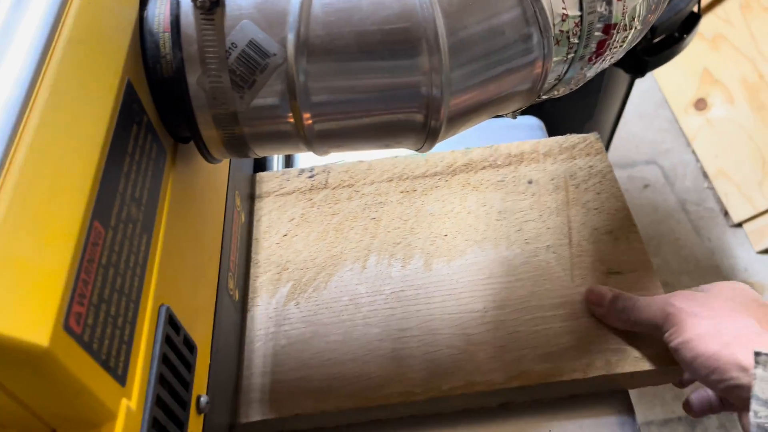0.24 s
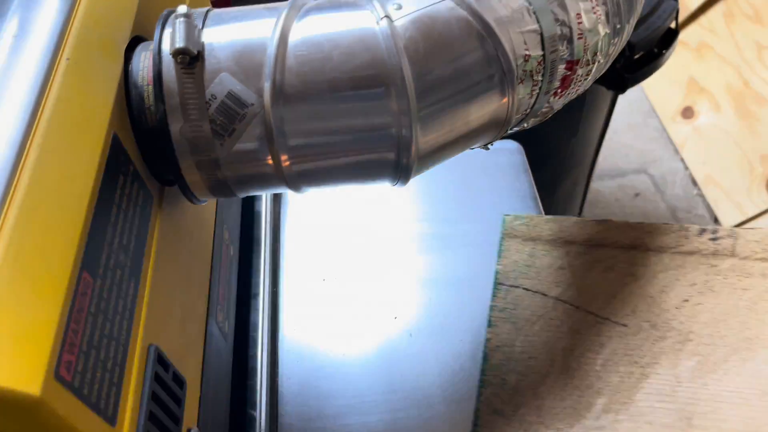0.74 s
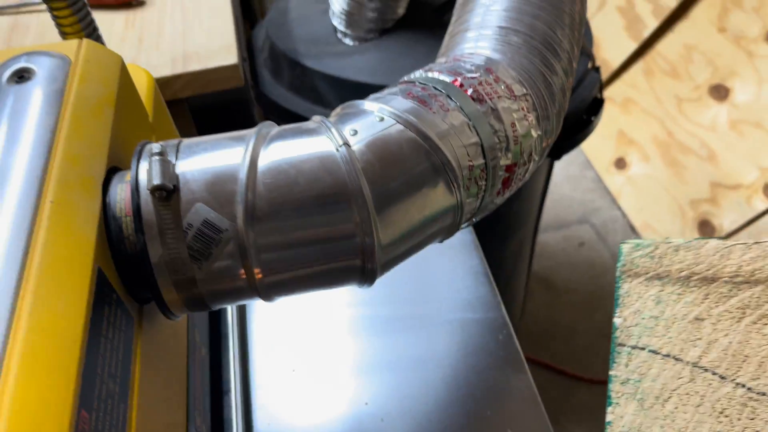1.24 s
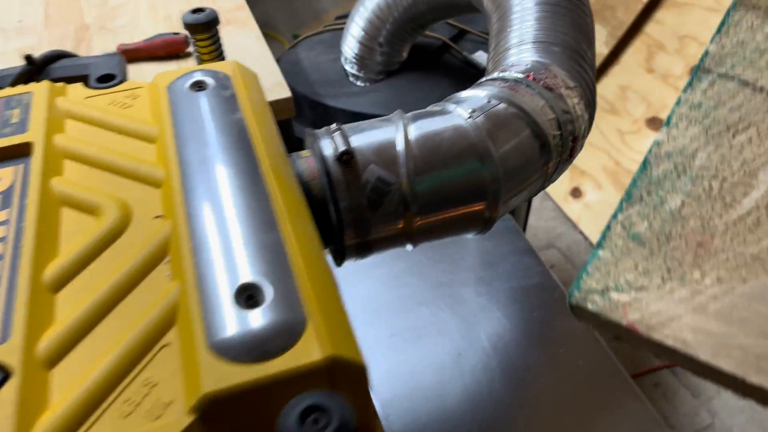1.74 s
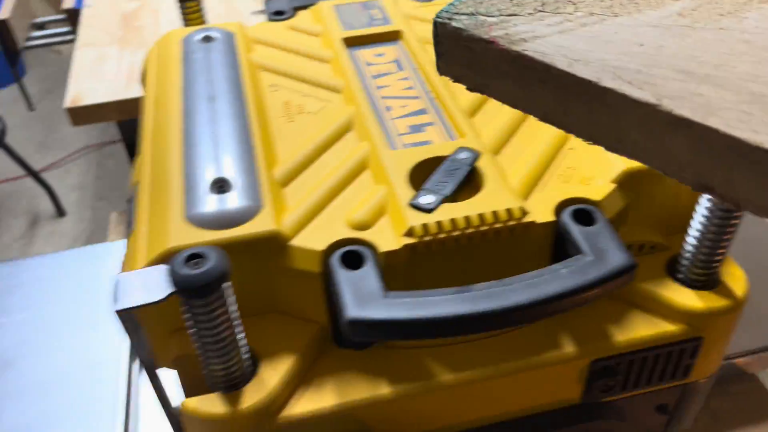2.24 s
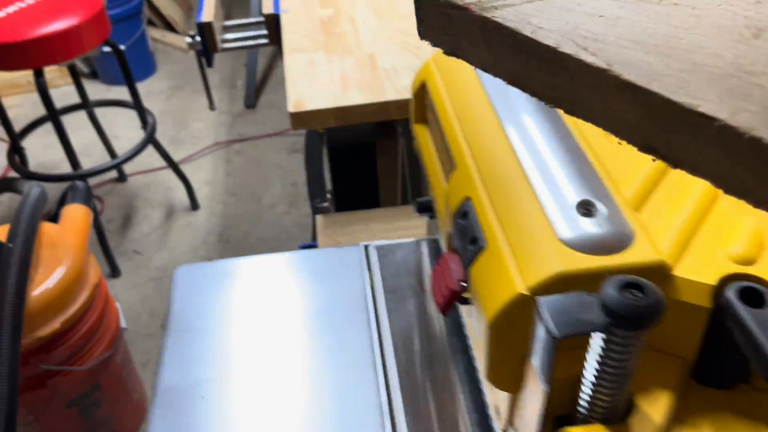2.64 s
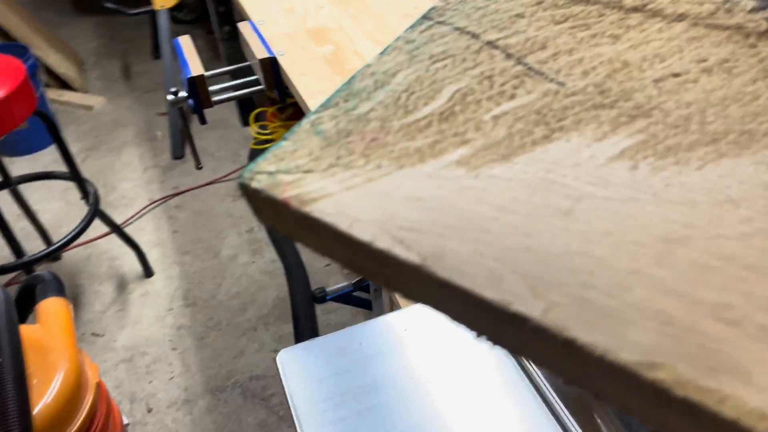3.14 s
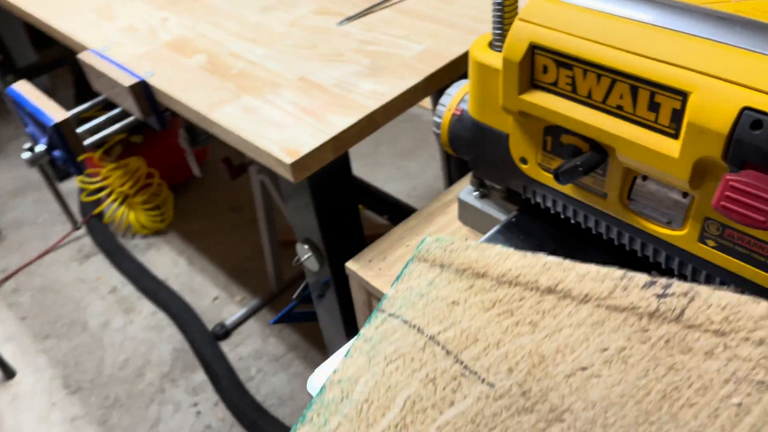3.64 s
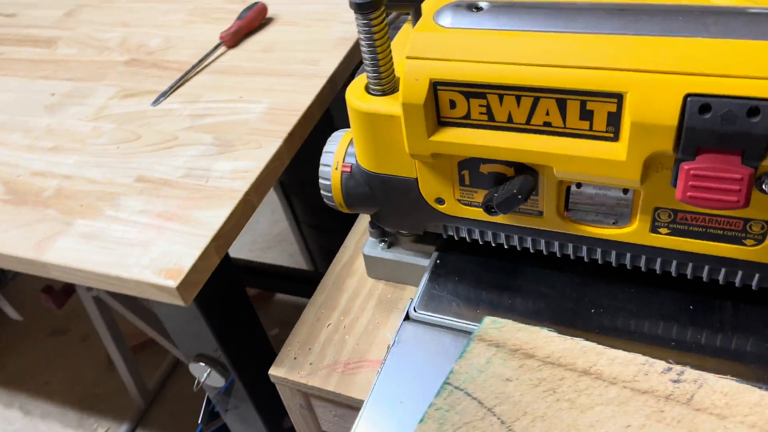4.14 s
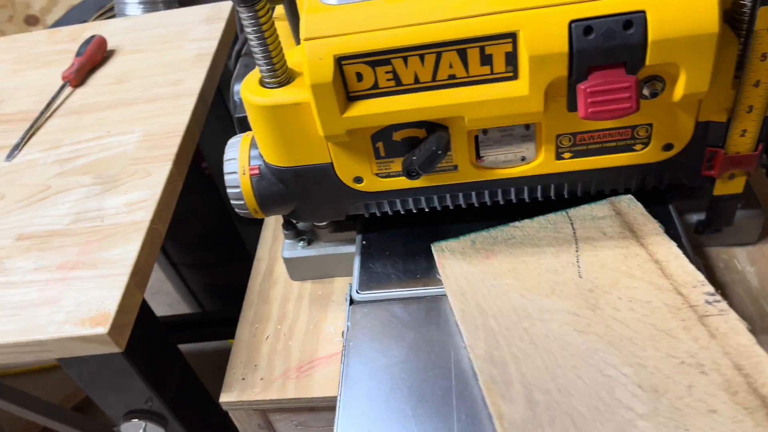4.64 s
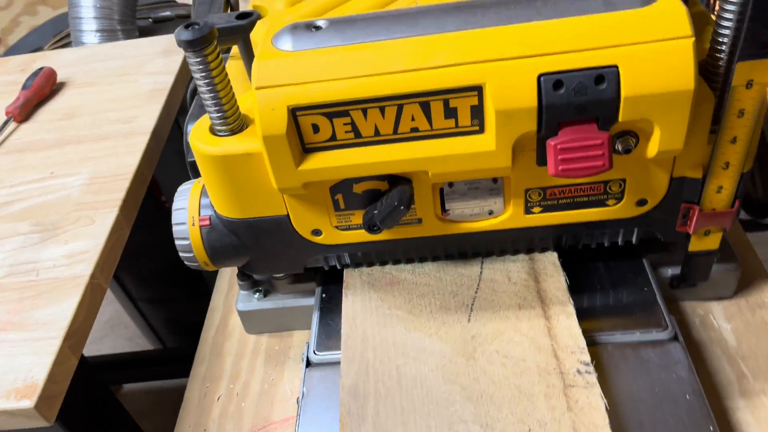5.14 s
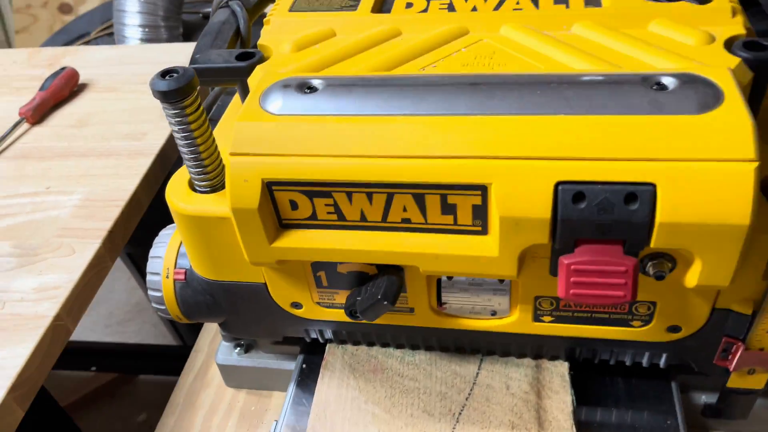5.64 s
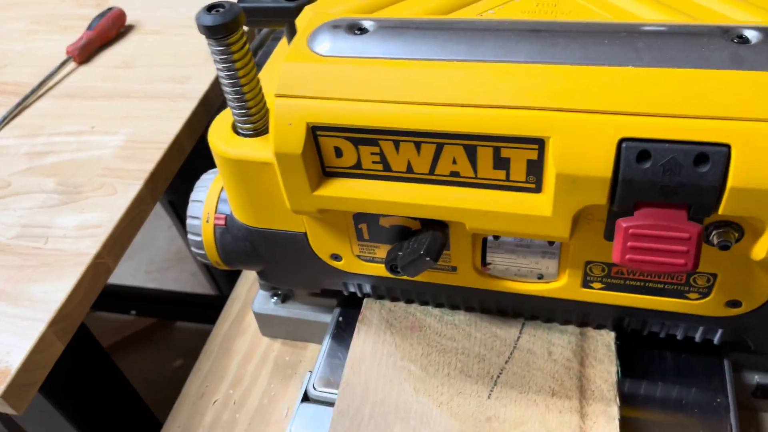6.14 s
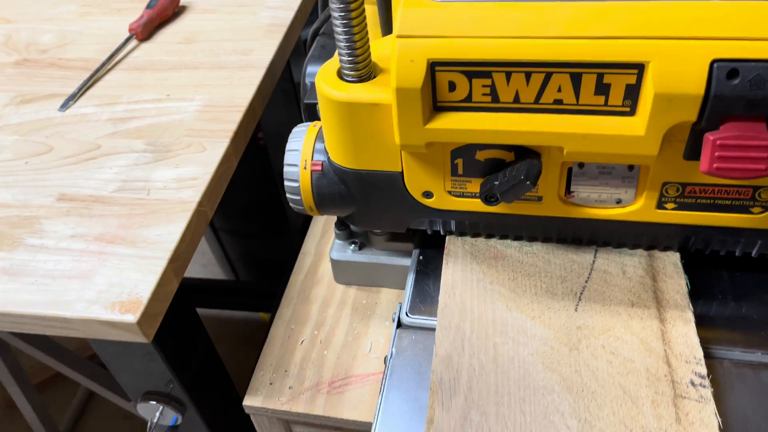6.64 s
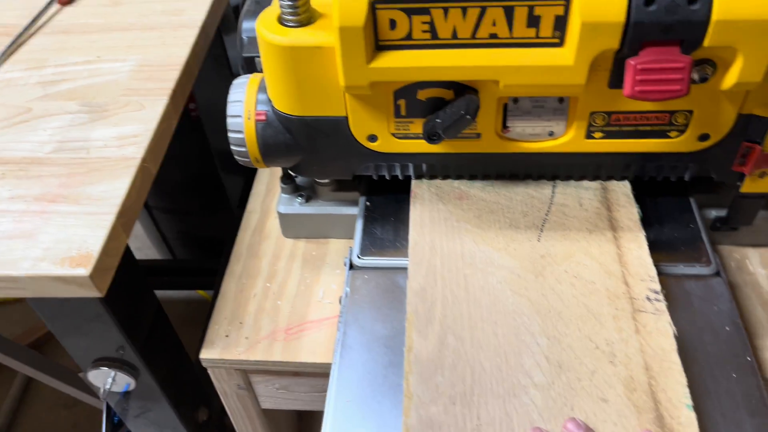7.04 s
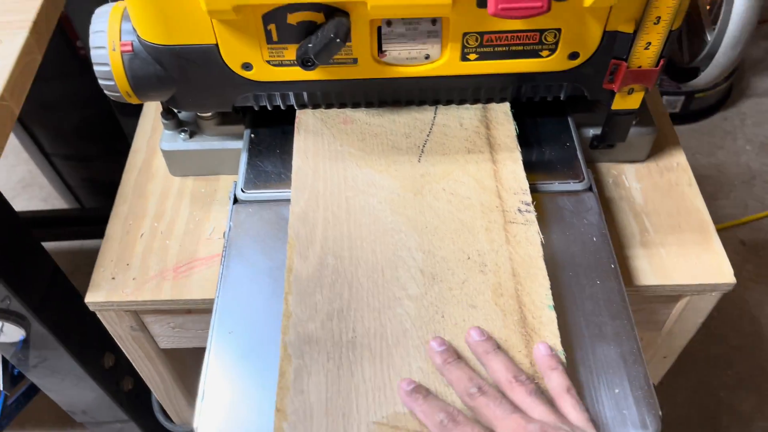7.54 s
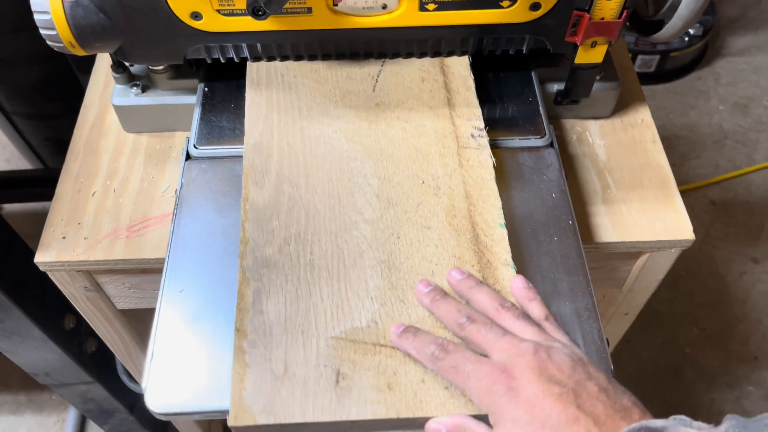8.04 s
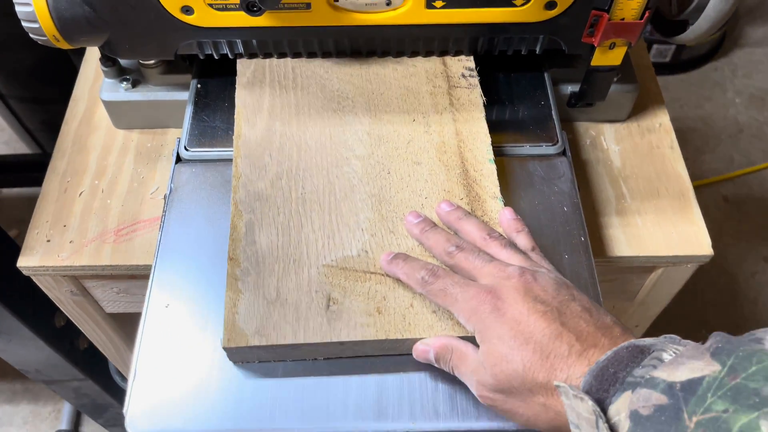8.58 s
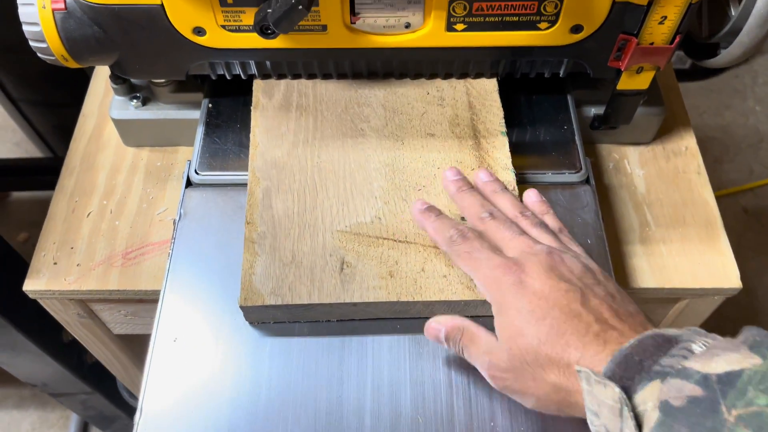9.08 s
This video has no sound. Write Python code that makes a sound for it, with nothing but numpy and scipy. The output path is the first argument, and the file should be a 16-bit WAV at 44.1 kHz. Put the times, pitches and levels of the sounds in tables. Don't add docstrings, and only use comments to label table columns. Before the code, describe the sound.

In a small workshop a thickness planer runs unloaded, a loud mid-low drone near 450 hertz with overtones, beating throb and broad air roar. A handheld stereo microphone moves close around it from outfeed to infeed, so the tone swells, dips and shifts sides. Faint board rubs and a soft thud pass beneath; at the very end knives start tearing into the board.

```python
import sys
import numpy as np
from scipy import signal
from scipy.fft import rfft, irfft, next_fast_len
from scipy.io import wavfile

SR = 44100
rng = np.random.default_rng(int(sys.argv[2]) if len(sys.argv) > 2 else 0)


def gain_from_db(level_db):
    decades = np.asarray(level_db, float) / 20
    return 10 ** decades


def master(y):
    cut = np.clip(np.atleast_2d(y).T, -1, 1)
    pcm = np.round(cut * 32767)
    wavfile.write(sys.argv[1], SR, pcm.astype(np.int16))


N = 410571
STEP = 64
CONTROL_S = np.arange(N // STEP + 2) * STEP / SR

# f/Hz, outfeed level/dB, infeed level/dB
MAINS_HUM = [(119.9, -65, -46.5), (237, -62, -61), (407.4, -73, -48.5), (543, -67, -45)]


def full(control):
    return np.interp(np.arange(N) / STEP, np.arange(N // STEP + 2), control + np.zeros(N // STEP + 2))


def in_time(rows):
    s, *columns = np.transpose(rows)
    return [np.interp(CONTROL_S, s, c) for c in columns]


def at_hz(points, hz, column=1):
    points = np.array(points)
    return np.interp(np.log(hz), np.log(points[:, 0]), points[:, column])


def crossings(rows):
    rows = np.array(rows)
    phase = np.pi * np.clip((CONTROL_S - rows[:, :1]) / rows[:, 1:2], -.5, .5)
    return rows[:, 2:].T @ np.cos(phase) ** 2


def drift(rate):
    r = np.exp(-2 * np.pi * STEP * rate / SR)
    slow = signal.lfilter([1], [1, -2 * r, r * r], rng.standard_normal(N // STEP + 3002))[3000:]
    return (slow - slow.mean()) / slow.std()


def band(x, low_hz, high_hz):
    y = signal.sosfilt(signal.butter(2, [low_hz, high_hz], "band", fs=SR, output="sos"), x)
    return y / y.std()


def tone(angle, left_db, right_db, left_rad, right_rad):
    ears = [(left_db, left_rad), (right_db, right_rad)]
    return np.array([np.sqrt(2) * full(gain_from_db(db)) * np.cos(angle + full(rad)) for db, rad in ears])


def arriving(angle, rows):
    left_db, right_db, rad, lead = in_time(rows)
    return tone(angle, left_db, right_db, rad, rad - lead)


def standing(angle, rows, rough):
    left_db, right_db, lead = in_time(rows)
    flutter = rough * drift(6)
    flicker_db = 0.14 + 2.5 * rough * drift(7)
    return tone(angle, left_db + flicker_db, right_db + flicker_db, flutter, flutter - lead)


def wandering(angle, db, wander_db, apart):
    flutter = 0.3 * drift(4.8)
    left_db = db + wander_db * drift(2.8)
    right_db = db + wander_db * drift(8.0)
    return tone(angle, left_db, right_db, flutter, flutter + apart * drift(0.3))


def reflected(x):
    echoes_s, sway_s, share = [.0031, .0074, .0127], .00012, .33
    n = np.arange(N)
    lags = [full(s + sway_s * drift(.5)) * SR for s in echoes_s]
    echoes = sum(np.array([np.interp(n - lag, n, ear) for ear in x]) for lag in lags)
    return (x + share * echoes) / np.sqrt(1 + len(lags) * share ** 2)


def angles():
    # t/s, rotation rate/(turns per s)
    head_speed = [(0.0, 149.62), (0.6, 149.9), (1.2, 150.1), (1.8, 150.23), (2.6, 150.37), (3.6, 150.53),
                  (5.0, 150.79), (6.5, 150.91), (8.0, 151.06), (9.31, 151.03)]
    motor_per_head, creep_rad_per_s = 1.94978, .2
    turn = 2 * np.pi * np.cumsum(full(in_time(head_speed)[0])) / SR
    return turn - creep_rad_per_s * np.arange(N) / SR, motor_per_head * turn


def roar(head, motor, side, patchy_db, chop):
    # f/Hz, level/dB per Hz
    outfeed_colour = [(25, -102), (100, -70.5), (250, -64.5), (550, -62.5), (900, -55.5), (1500, -66),
                      (2300, -65), (3300, -70.5), (4300, -69.5), (6500, -74.5), (8300, -84.5), (9500, -64),
                      (11300, -78), (12600, -84.5)]
    infeed_colour = [(25, -99.5), (100, -76), (250, -65), (500, -62), (850, -62), (1500, -64.5),
                     (2500, -73.5), (3400, -74.5), (4400, -74), (6800, -84.5), (8300, -89), (9500, -77.5),
                     (11300, -78), (12600, -92)]
    # f/Hz, width/Hz, level/dB
    resonances = [(87, 20, -2), (271.6, 19.5, 10), (420, 44, 8), (575, 130, 5.5), (764, 52, 5.5),
                  (1477, 41, 6), (2980, 100, 0.5), (6420, 750, 3.5), (7980, 630, 6.5), (65, 30, -1),
                  (180, 30, 7.5), (3404, 130, -5.5)]
    # f/Hz, outfeed, infeed
    likeness = [(30, .9, .93), (90, 0.4, 0.57), (190, 0.73, 0.84), (300, 0.74, 0.84), (417, 0.46, 0.073),
                (700, 0.35, 0.14), (1360, -0.28, 0.63), (2640, -0.59, 0.09), (4130, -0.064, 0.19),
                (5400, 0.024, 0.042), (8000, 0.34, 0.044)]
    # t/s, level/dB
    nearness = [(0, -2), (1.3, -1.9), (2, -3.5), (2.7, -1.3), (3.4, -2), (4, -0.6), (4.6, -0.8), (6, -0.5),
                (7.6, -0.3), (9.31, 0.15)]
    # f/Hz, share
    near_share = [(200, 0.24), (700, 1.4), (3000, 0.69), (10000, 2.3)]
    pan_db = 2.5
    size = next_fast_len(N)
    hz = np.maximum(np.arange(size // 2 + 1) * SR / size, 1)
    colour_db = at_hz(infeed_colour, hz)
    colour_db = colour_db + sum(db / (1 + ((hz - f) / w * 2) ** 2) for f, w, db in resonances)
    white = rfft(rng.standard_normal((2, size))) * gain_from_db(colour_db) * np.sqrt(SR) / 2
    near_db, = in_time(nearness)
    centres = 25 * 2 ** np.arange(0, 9.5, .36)
    out = np.zeros((3, 2, N))
    for k, centre in enumerate(centres):
        window = np.interp(np.log(hz), np.log(centres), np.arange(len(centres)) == k)
        mid, apart = irfft(white * window, size)[:, :N]
        db = at_hz(near_share, centre) * near_db
        db += (at_hz(outfeed_colour, centre) - at_hz(infeed_colour, centre)) * (1 - side)
        db += patchy_db * (drift(2.6) + 1.4 * drift(19))
        alike = at_hz(likeness, centre) * (1 - side) + at_hz(likeness, centre, column=2) * side
        alike = np.clip(alike, -.99, .995)
        mid = mid * full(gain_from_db(db) * np.sqrt(1 + alike))
        apart = apart * full(gain_from_db(db) * np.sqrt(1 - alike))
        out[np.searchsorted([1500, 7000], centre)] += [mid + apart, mid - apart]
    low, middle, high = out
    tilt = gain_from_db(pan_db / 2 * np.array([[1], [-1]]))
    middle = reflected(middle) * tilt * (1 + chop * np.cos(3 * head))
    return low + middle + high * (1 + chop * np.cos(motor))


def weak_tones(head, motor, side):
    weak_orders = [(2, 1, -37.5, -52), (0, 2, -68, -51), (0, 7, -53, -67), (3, 1, -48, -54),
                   (0, 31, -59, -81), (0, 33, -64, -67), (0, 34, -72, -64), (0, 35, -67, -69),
                   (0, 36, -49, -63), (0, 38, -63, -68), (0, 39, -47, -69)]
    # t/s, left level/dB, right level/dB, left lead/rad
    head_4 = [(0.1, -36.5, -43.0, 0.4), (0.35, -39.5, -44.0, -0.1), (0.6, -33.0, -41.0, 1.0),
              (1.4, -31.0, -34.5, 0.9), (1.65, -33.0, -33.0, 1.6), (1.85, -36.0, -39.5, 2.5),
              (2.55, -42.0, -36.5, -0.4), (3.05, -34.0, -37.0, 1.2), (3.25, -38.0, -34.5, 0.9),
              (3.4, -52.5, -35.5, 0.8), (4.0, -41.5, -42.5, -1.8), (4.25, -54.5, -42.5, -3.3),
              (4.35, -54.0, -38.0, -0.2), (5.25, -43.0, -38.0, 2.1), (5.6, -47.5, -47.5, 1.5),
              (5.95, -46.0, -44.0, 0.8), (6.25, -39.5, -38.0, 1.4), (7.1, -46.5, -41.0, 4.3),
              (8.0, -52.5, -42.5, 3.9), (9.2, -42.0, -38.5, 2.8)]
    head_5 = [(0.1, -41.0, -43.5, 1.5), (1.7, -37.5, -39.5, 2.1), (2.3, -36.5, -42.5, -0.7),
              (3.1, -42.5, -42.0, -2.6), (3.55, -36.0, -32.0, 0.5), (5.65, -48.0, -50.0, 2.8),
              (5.9, -50.0, -52.0, 4.4), (6.95, -33.5, -34.0, 3.9), (7.75, -48.0, -52.0, 6.6),
              (9.05, -36.0, -40.5, 7.1), (9.2, -45.0, -42.0, 5.8)]
    motor_16 = [(0.1, -43.5, -64.5, -2.9), (0.25, -47.0, -63.0, -2.4), (1.6, -51.0, -53.5, -5.6),
                (1.9, -62.0, -59.5, -5.8), (4.5, -59.5, -56.5, -4.6), (6.4, -57.5, -66.5, -5.0),
                (6.85, -56.0, -57.5, -5.0), (7.8, -51.5, -58.0, -2.0), (8.3, -61.0, -63.0, -0.5),
                (8.6, -52.0, -63.0, 0.6), (9.2, -55.0, -58.5, 0.3)]
    # centre t/s, width/s, level/dB
    head_8_crests = [(2.8, 2.1, 8.8), (8.4, 6.2, 10)]
    out = wandering(8 * head, -52 + crossings(head_8_crests)[0], wander_db=1.8, apart=.7)
    out += standing(5 * head, head_5, rough=.15)
    out += standing(4 * head, head_4, rough=.15)
    out += standing(16 * motor, motor_16, rough=.25)
    for h, m, out_db, in_db in weak_orders:
        db = out_db + (in_db - out_db) * side
        out += wandering(round(h) * head + round(m) * motor, db, wander_db=3.0, apart=1.34)
    for hz, out_db, in_db in MAINS_HUM:
        db = out_db + (in_db - out_db) * side
        angle = 2 * np.pi * hz * np.arange(N) / SR
        out += tone(angle, db + 0.86 * drift(0.67), db, 0, -.002 * hz * (1 - side))
    return out


def shafts(head, motor):
    # t/s, left level/dB, right level/dB, left arrival/rad, left lead/rad
    head_1 = [(0.12, -33.0, -33.5, -1.6, 0.3), (1.24, -35.0, -36.0, -1.5, 0.4),
              (2.36, -38.0, -37.5, -0.5, 0.3), (6.16, -38.5, -35.5, 0.1, -0.1),
              (9.12, -37.5, -35.0, -0.3, 0.1)]
    head_2 = [(0.12, -41.0, -44.5, -0.8, -0.7), (1.08, -35.0, -36.5, -0.7, -0.1),
              (1.48, -35.5, -36.5, -0.3, -0.2), (2.84, -37.0, -32.5, -0.3, -0.1),
              (5.16, -36.5, -37.0, -2.1, -0.8), (6.56, -37.0, -35.5, -1.3, -0.9),
              (9.12, -37.0, -33.5, -1.2, -0.7)]
    motor_1 = [(0.12, -36.0, -39.5, 1.8, -0.2), (0.96, -39.5, -45.5, 2.4, -1.1),
               (1.48, -35.5, -43.5, 2.5, -0.6), (2.64, -30.5, -28.0, 2.6, 0.1),
               (2.88, -31.0, -27.0, 2.8, 0.2), (3.2, -33.5, -29.0, 2.6, -0.0),
               (7.4, -33.5, -30.0, 2.5, 0.1), (9.12, -35.0, -33.0, 2.6, 0.2)]
    return arriving(head, head_1) + arriving(2 * head, head_2) + arriving(motor, motor_1)


def whine(motor):
    # t/s, left level/dB, right level/dB, left lead/rad
    vanes = [(0.1, -48.5, -50.0, 1.0), (0.35, -55.0, -56.5, 1.0), (1.0, -50.0, -52.5, 3.1),
             (1.25, -50.5, -57.5, 4.6), (1.9, -57.0, -55.0, 5.1), (2.05, -51.0, -49.0, 6.8),
             (2.15, -58.5, -62.5, 4.3), (3.0, -54.5, -61.0, 4.7), (5.2, -61.0, -66.5, 4.7),
             (6.1, -48.5, -60.5, 7.2), (6.2, -61.5, -60.0, 7.5), (6.95, -52.5, -67.0, 9.8),
             (7.35, -49.0, -58.5, 7.5), (7.75, -56.0, -56.5, 9.2), (8.25, -49.0, -65.0, 6.6),
             (8.4, -46.5, -58.0, 8.8), (9.2, -53.0, -61.5, 7.2)]
    since_leaving_s = np.maximum(CONTROL_S - 0.62, 0)
    bars_db = np.maximum(-37 - 9 * since_leaving_s, -61)
    mains = 2 * np.pi * MAINS_HUM[0][0] * np.arange(N) / SR
    flutter = .3 * drift(9)
    bars = tone(32 * motor + 0.22 * np.sin(2 * mains), bars_db, bars_db, flutter, flutter)
    return standing(21 * motor, vanes, rough=.25) + bars * (1 + 0.84 * np.cos(mains))


def handling():
    # t/s, length/s, level/dB, low f/Hz, high f/Hz
    rubs = [(0.77, 0.74, -41.5, 630, 680), (3.96, 0.96, -36, 1400, 1560), (4.6, 2.1, -50.5, 2860, 2900),
            (5.14, 1.16, -46, 3150, 3270), (4.3, 2.6, -38, 800, 845), (1.5, 4.3, -43, 308, 322),
            (2.37, 2.8, -39, 412, 428), (4.5, 2.4, -37.5, 395, 430), (3.63, 1.3, -45, 2750, 3050),
            (4.5, 3.9, -50, 4230, 4320), (4.58, 2.2, -49.5, 5050, 5300), (0.47, 1.4, -46, 3800, 4200),
            (7.1, 1.7, -55, 95, 113), (5.54, 0.68, -42.5, 950, 1020), (8.6, 1.2, -43.5, 2400, 2600)]
    knocks = [
        (.45, .1, -52, 7000, 12500),
        (4.93, .06, -50, 25, 110),
        (7.915, .04, -39, 8600, 12000),
        (3.86, .8, -39, 4120, 4620),
    ]
    out = np.zeros((2, N))
    white = rng.standard_normal(N) + .5 * rng.standard_normal((2, N))
    for s, length, db, low_hz, high_hz in [*rubs, *knocks]:
        shape = np.abs(np.sin(np.pi * np.clip((CONTROL_S - s) / length, 0, 1))) ** .5
        level = gain_from_db(db + 1.3 * drift(15) + .9 * drift(4)) * shape
        out += full(level) * band(white, low_hz, high_hz)
    return out


def bite(head):
    # f/Hz, width/Hz, level/dB
    board_modes = [(3240, 1000, 0), (4940, 140, -6), (6560, 300, -13), (8050, 2300, -9), (10700, 830, -6)]
    start_s, level_db, rise_s = 9.243, -32, .022
    blows = np.diff(np.floor(3 * head / (2 * np.pi)), prepend=0)
    blows = blows * 9 * full(gain_from_db(3 * drift(110)))
    force = blows + 1.1 * rng.standard_normal((2, N))
    sound = sum(gain_from_db(db) * band(force, hz - w / 2, hz + w / 2) for hz, w, db in board_modes)
    return gain_from_db(level_db) * np.clip((np.arange(N) / SR - start_s) / rise_s, 0, 1) * sound


def knives(head, motor):
    # t/s, left level/dB, right level/dB, left arrival/rad, left lead/rad
    knife_pass = [(0.06, -16.0, -31.0, 2.1, 3.0), (0.39, -16.0, -33.5, 2.2, 1.4),
                  (0.48, -17.0, -26.0, 2.0, 2.7), (0.6, -19.5, -27.0, 2.2, 2.2),
                  (0.75, -18.5, -23.5, 2.4, 2.2), (1.32, -22.0, -31.0, 3.3, 3.5),
                  (1.62, -23.5, -26.0, 3.9, 4.7), (2.1, -24.0, -31.0, 3.2, 1.5),
                  (2.31, -27.0, -27.5, 1.6, -0.5), (2.61, -22.0, -22.0, 1.6, -0.2),
                  (2.82, -26.5, -18.5, 2.2, 0.3), (3.06, -30.0, -28.0, 4.2, 2.6),
                  (3.24, -21.5, -22.5, 4.3, 3.1), (3.51, -18.5, -34.0, 3.9, 3.2),
                  (3.78, -18.5, -32.0, 3.8, 0.6), (4.14, -17.5, -19.0, 4.3, 0.8),
                  (4.89, -17.5, -17.5, 4.3, 0.9), (4.98, -22.5, -23.0, 4.5, 1.3),
                  (5.04, -20.0, -19.0, 4.1, 1.1), (5.37, -18.5, -20.0, 3.7, 1.2), (5.5, -19, -20, 3.7, 1.4),
                  (5.585, -21.5, -22, 4.1, 2.3), (5.66, -22, -20, 3.7, 1.6), (5.76, -24.5, -16.5, 2.7, 1.1),
                  (5.91, -22.0, -19.5, 3.8, 1.8), (6.03, -26.5, -16.5, 3.2, 1.3),
                  (6.09, -21.5, -16.5, 3.6, 1.3), (6.18, -18.0, -23.5, 4.6, 1.9),
                  (6.3, -19.0, -18.0, 4.3, 1.3), (6.42, -18.0, -21.5, 4.8, 1.6),
                  (6.63, -17.5, -20.0, 5.0, 1.4), (6.96, -21.0, -18.0, 4.8, 1.3),
                  (7.05, -22.0, -19.0, 4.7, 1.5), (7.38, -20.5, -19.0, 4.5, 1.1),
                  (7.53, -18.0, -19.0, 4.7, 1.1), (8.07, -20.5, -21.0, 4.4, 1.2),
                  (8.58, -19.5, -20.0, 4.3, 1.1), (8.64, -18.5, -18.0, 4.3, 1.0),
                  (9.12, -18.0, -21.0, 4.3, 1.0), (9.24, -18.0, -20.5, 3.8, 1.0)]
    throb = [(0.08, -37.5, -37.5, -3.0, -4.8), (1.16, -40.0, -39.0, -2.5, -4.3),
             (1.64, -39.5, -50.5, -1.0, -3.5), (2.0, -50.0, -37.5, -1.3, -6.9),
             (3.08, -32.5, -46.5, -0.6, -5.6), (3.36, -32.5, -32.0, -0.8, -6.4),
             (3.72, -31.5, -28.0, -1.0, -6.4), (4.4, -36.5, -32.0, -0.5, -5.5),
             (5.12, -34.5, -31.0, -1.2, -5.5), (5.44, -34.5, -33.0, -1.2, -6.1),
             (5.96, -29.5, -29.0, -0.8, -5.8), (6.04, -35.5, -32.0, -1.6, -6.0),
             (6.12, -32.5, -32.0, -0.9, -6.5), (6.52, -33.0, -32.0, -0.3, -5.8),
             (7.16, -35.5, -32.0, -1.0, -5.5), (8.96, -34.0, -32.0, -0.3, -5.5),
             (9.2, -36.0, -34.5, -0.6, -5.5)]
    # t/s, left level/dB, right level/dB, left lead/rad
    overtone_2 = [(0.1, -29.0, -30.0, 3.0), (0.2, -26.5, -28.0, 3.1), (0.6, -28.5, -28.5, 1.6),
                  (1.15, -28.0, -32.0, 2.1), (2.25, -35.5, -40.5, 2.1), (2.3, -34.0, -36.0, 2.5),
                  (3.0, -40.0, -33.0, 5.5), (3.2, -30.5, -31.0, 6.2), (3.4, -36.5, -38.0, 8.5),
                  (3.65, -28.0, -31.0, 9.0), (4.0, -25.5, -27.0, 9.7), (4.15, -24.5, -37.0, 10.3),
                  (4.4, -24.5, -28.0, 12.8), (5.25, -25.5, -33.0, 12.2), (5.55, -28.5, -27.0, 10.0),
                  (6.0, -44.0, -44.5, 8.7), (6.35, -29.0, -30.5, 10.0), (6.6, -26.0, -37.0, 11.9),
                  (6.95, -28.0, -29.5, 13.4), (8.4, -25.5, -43.0, 13.6), (8.8, -23.0, -34.0, 14.4),
                  (9.2, -26.5, -47.0, 16.0)]
    overtone_3 = [(0.1, -34.5, -46.5, -2.0), (0.65, -43.5, -40.5, -0.9), (0.7, -44.5, -41.0, -2.7),
                  (0.95, -55.0, -44.5, -5.2), (1.55, -34.5, -46.0, -5.3), (1.75, -43.0, -39.0, -5.2),
                  (2.3, -40.5, -54.5, -5.4), (2.5, -35.5, -40.0, -5.1), (3.1, -40.5, -39.5, -2.2),
                  (3.35, -31.0, -37.0, -1.9), (3.85, -44.0, -43.0, -1.2), (4.15, -31.5, -34.5, -1.0),
                  (4.75, -31.5, -34.0, 0.2), (5.6, -29.5, -33.0, -1.2), (5.95, -41.0, -32.0, -1.1),
                  (6.4, -31.0, -35.0, -1.4), (6.65, -32.5, -31.0, -0.0), (6.9, -33.0, -31.5, -0.7),
                  (8.5, -28.0, -33.0, -0.2), (8.7, -24.5, -29.5, -0.3), (9.15, -32.0, -32.0, -0.6),
                  (9.2, -30.0, -30.0, -0.6)]
    overtone_4 = [(0.1, -39.0, -47.0, 1.8), (1.4, -36.5, -41.0, 1.3), (1.5, -36.0, -39.0, 2.6),
                  (1.85, -40.5, -47.5, 4.9), (2.85, -46.0, -49.0, 4.2), (3.0, -36.0, -43.0, 4.9),
                  (3.4, -55.5, -46.5, 6.0), (3.45, -54.0, -45.5, 3.1), (3.9, -47.0, -43.5, 4.9),
                  (4.55, -37.5, -38.0, 5.3), (4.7, -39.5, -44.5, 6.1), (4.8, -43.5, -54.0, 3.1),
                  (5.05, -44.0, -40.5, 4.6), (6.25, -38.0, -35.5, 4.8), (6.5, -45.5, -41.0, 4.5),
                  (6.6, -39.0, -36.0, 4.6), (7.25, -38.5, -46.5, 4.7), (7.65, -39.0, -40.5, 5.8),
                  (7.95, -43.0, -41.0, 3.5), (8.2, -52.5, -53.0, 4.6), (8.35, -35.5, -37.0, 6.3),
                  (9.1, -35.0, -44.5, 6.2), (9.2, -30.0, -36.0, 5.5), (9.25, -32.0, -39.0, 6.8)]
    overtone_5 = [(0.1, -58.0, -53.0, -2.0), (0.65, -57.0, -55.5, -4.4), (0.85, -47.0, -40.0, -3.8),
                  (1.05, -52.5, -47.5, -4.1), (2.35, -48.5, -51.0, -6.0), (2.55, -49.0, -45.5, -3.7),
                  (2.65, -47.0, -42.5, -6.2), (2.9, -50.0, -47.5, -3.5), (3.2, -43, -44.5, -5.8),
                  (3.42, -52, -50, -5.4), (3.7, -50.0, -47.5, -6.5), (4.05, -40.0, -47.5, -7.9),
                  (4.5, -43.5, -37.5, -5.9), (5.1, -58.0, -47.0, -6.1), (5.8, -43.0, -52.5, -8.3),
                  (6.35, -42.0, -59.5, -5.8), (6.5, -52.0, -45.5, -5.6), (7.5, -52.0, -51.5, -3.3),
                  (7.65, -46.5, -45.5, -3.5), (8.75, -50.0, -48.5, -5.3), (9.2, -39.5, -40.0, -6.1)]
    overtone_6 = [(0.1, -59.5, -60.5, -2.1), (3.85, -57.0, -56.5, -2.2), (4.6, -50.0, -44.5, 0.4),
                  (5.8, -53.0, -60.0, 2.6), (7.0, -56.5, -57.0, 0.8), (8.2, -45.0, -58.5, 0.9),
                  (9.1, -66.5, -59.5, 2.8), (9.2, -48.5, -55.0, 0.8), (9.25, -41.0, -53.5, 1.3)]
    out = arriving(3 * head, knife_pass) + arriving(head + motor, throb)
    overtones = [overtone_2, overtone_3, overtone_4, overtone_5, overtone_6]
    for order, rows in enumerate(overtones, start=2):
        out += standing(3 * order * head, rows, rough=.03 * order)
    return out


def scene():
    # t/s, place (0 outfeed - 1 infeed)
    walk = [
        (0, 0.059),
        (1.3, 0.075),
        (1.9, 0.13),
        (2.5, 0.55),
        (3.1, 0.58),
        (4.2, 0.56),
        (9.31, 0.93),
    ]
    head, motor = angles()
    side, = in_time(walk)
    tones = knives(head, motor) + shafts(head, motor) + weak_tones(head, motor, side) + whine(motor)
    return tones + roar(head, motor, side, patchy_db=.8, chop=.08) + handling() + bite(head)


def low_pass(x):
    return signal.sosfilt(signal.butter(12, 13660, fs=SR, output="sos"), x)


def record(dry):
    # f/Hz, left lead/rad
    port_lead = [(8300, 0), (8800, -.3), (9300, -1.8), (9900, -3.1), (10350, -3.2), (11000, -4.5),
                 (11900, -2 * np.pi)]
    # f/Hz, level/dB
    port_side = [(7000, 0), (8200, -2), (8800, -9), (9700, -13), (13000, -18)]
    # f/Hz, level/dB
    port_top = [(12000, 0.5), (12500, 2), (13000, -4), (13700, -24)]
    size = next_fast_len(N)
    hz = np.maximum(np.arange(size // 2 + 1) * SR / size, 1)
    left, right = rfft(dry, size) * gain_from_db(at_hz(port_top, hz)) / 2
    mid = left + right
    side = (left - right) * gain_from_db(at_hz(port_side, hz))
    turn = np.exp(.5j * at_hz(port_lead, hz) * [[1], [-1]])
    ports = irfft(np.array([mid + side, mid - side]) * turn, size)[:, :N]
    return low_pass(ports)


dry = scene()
out = record(dry)
master(out)
```